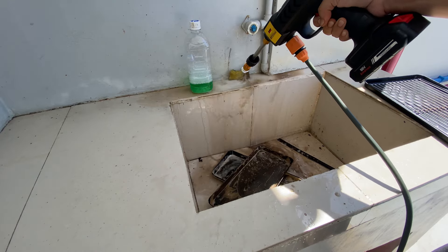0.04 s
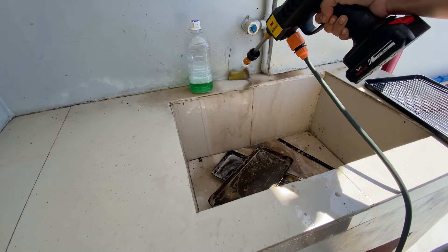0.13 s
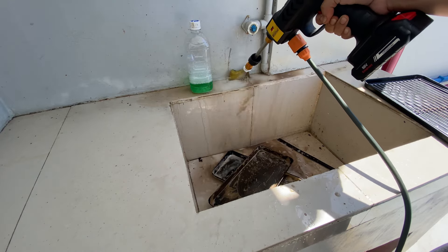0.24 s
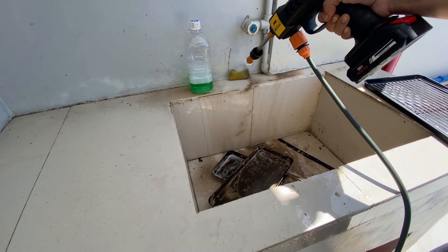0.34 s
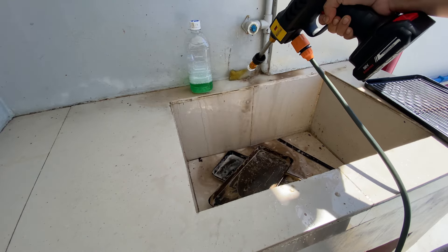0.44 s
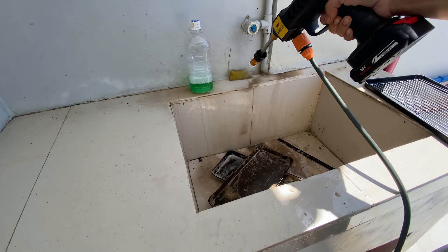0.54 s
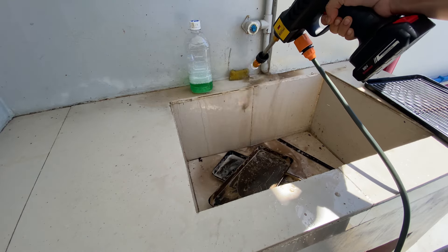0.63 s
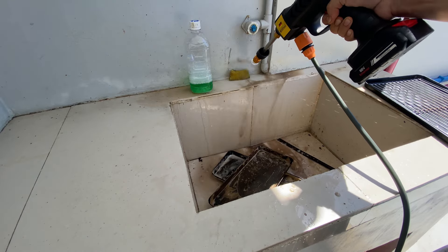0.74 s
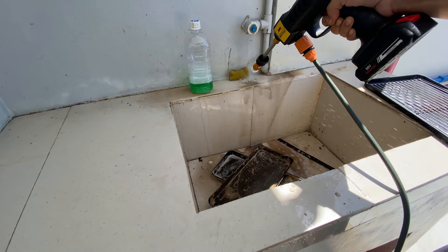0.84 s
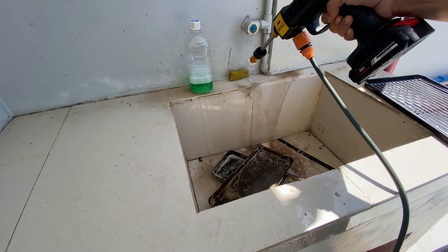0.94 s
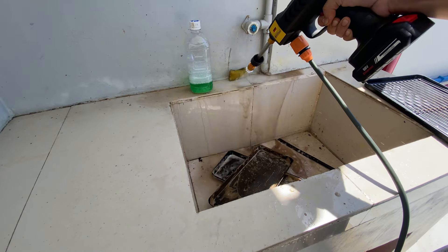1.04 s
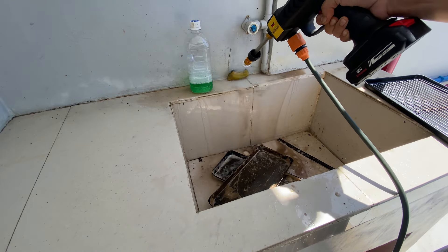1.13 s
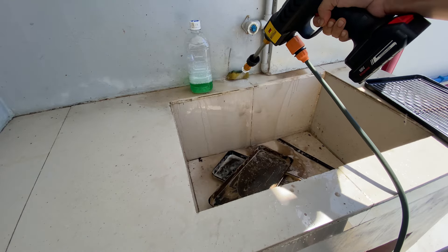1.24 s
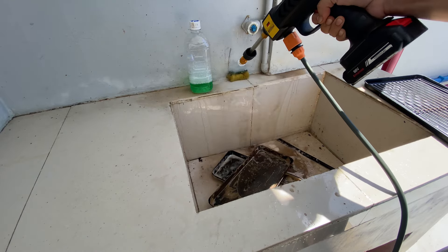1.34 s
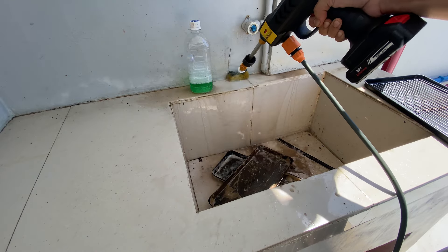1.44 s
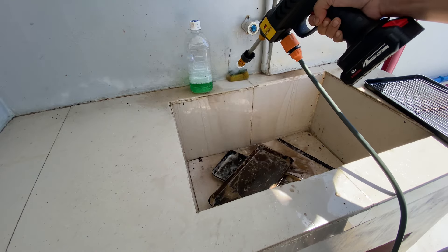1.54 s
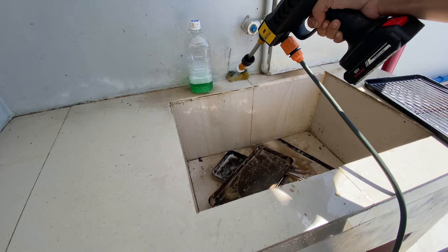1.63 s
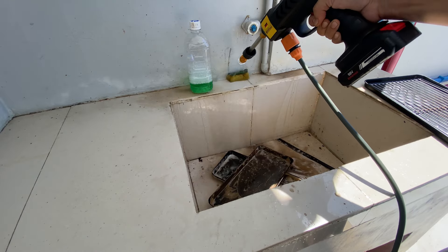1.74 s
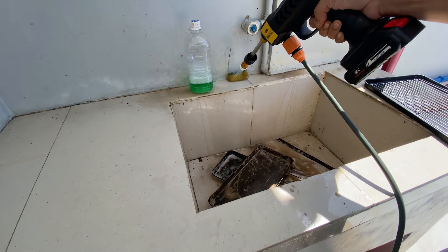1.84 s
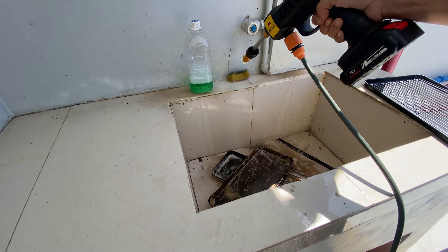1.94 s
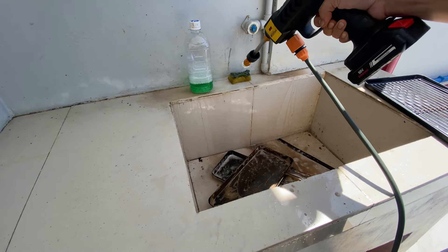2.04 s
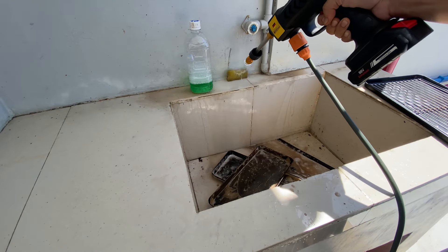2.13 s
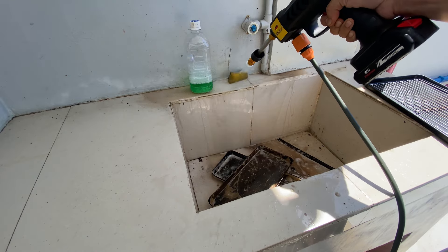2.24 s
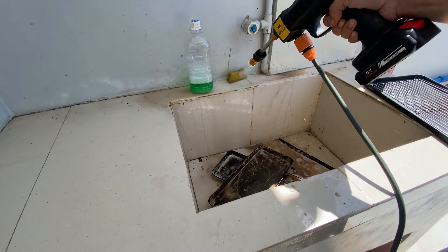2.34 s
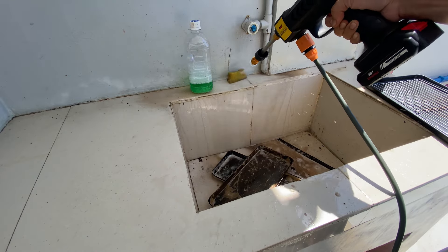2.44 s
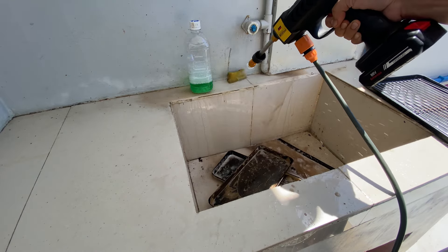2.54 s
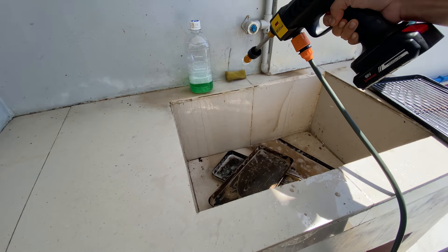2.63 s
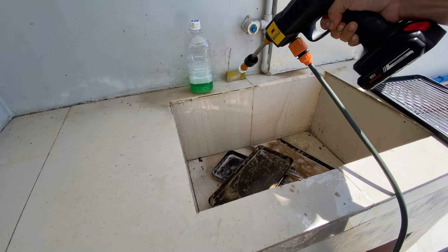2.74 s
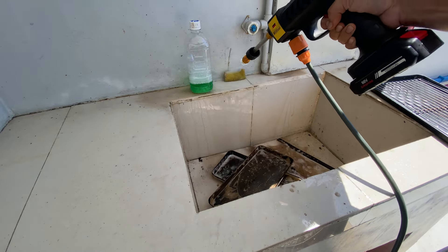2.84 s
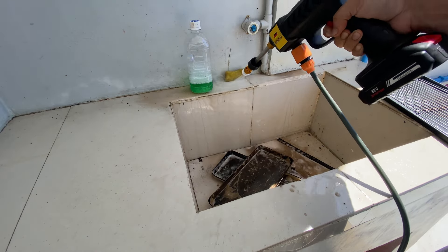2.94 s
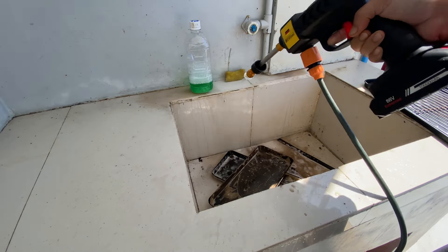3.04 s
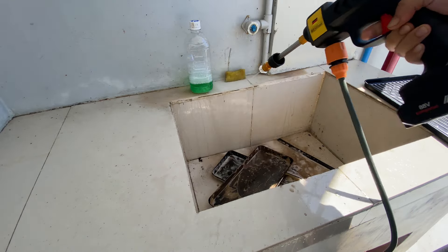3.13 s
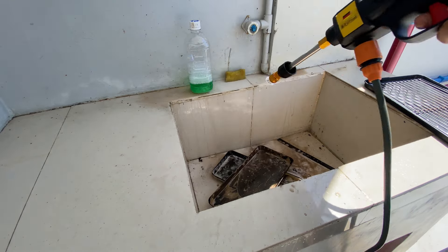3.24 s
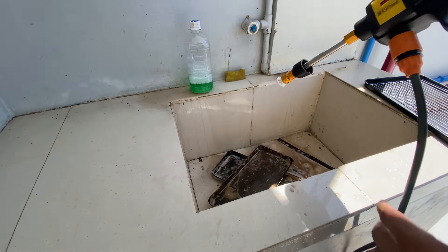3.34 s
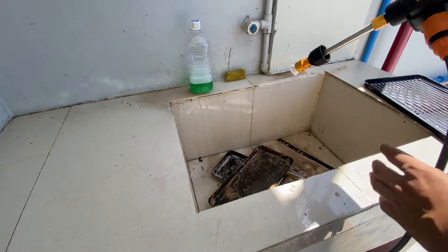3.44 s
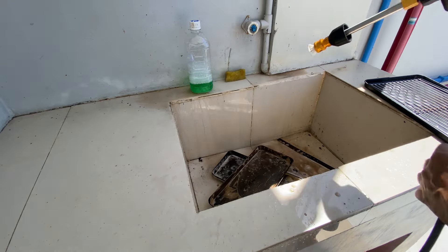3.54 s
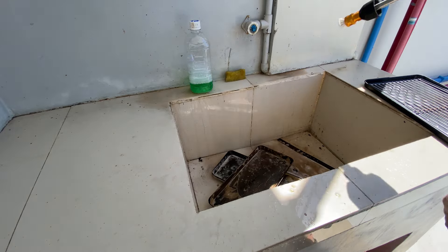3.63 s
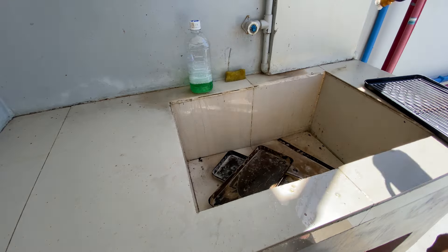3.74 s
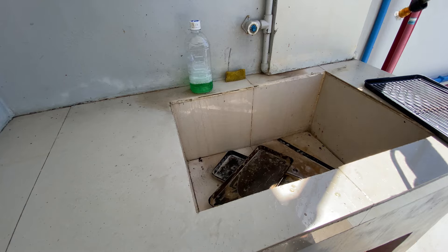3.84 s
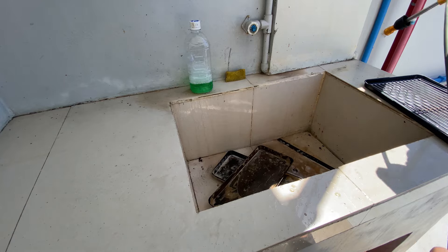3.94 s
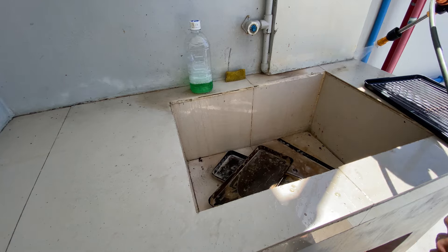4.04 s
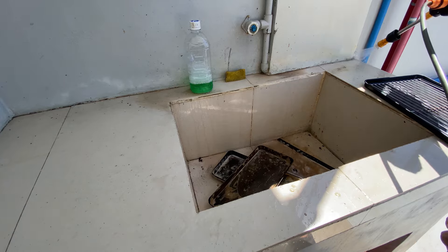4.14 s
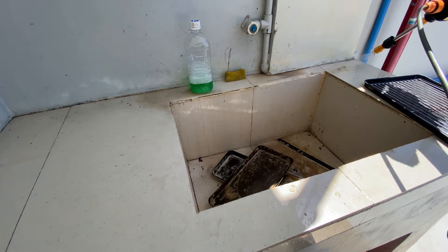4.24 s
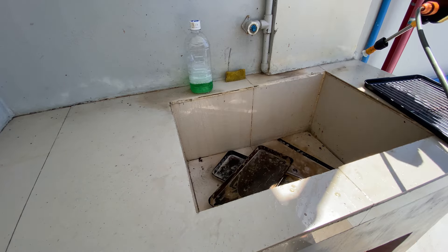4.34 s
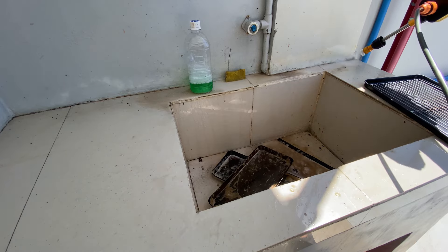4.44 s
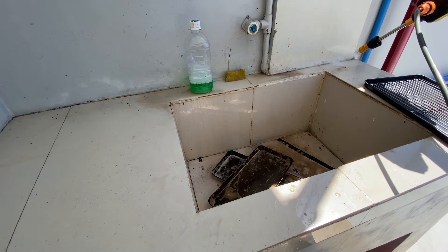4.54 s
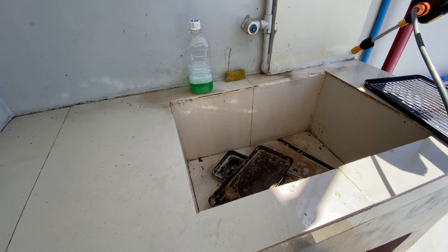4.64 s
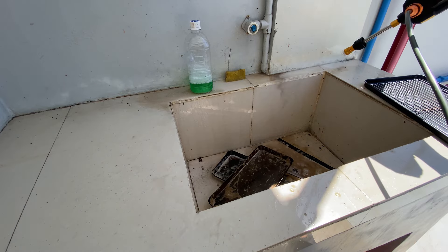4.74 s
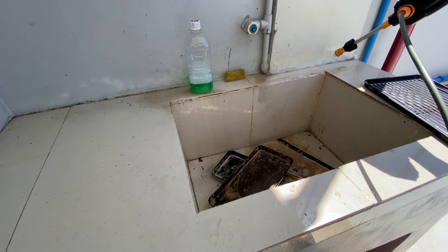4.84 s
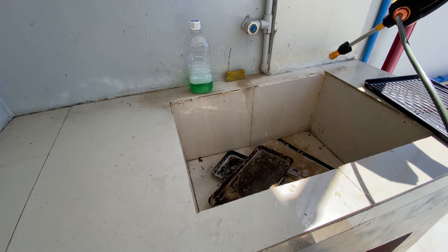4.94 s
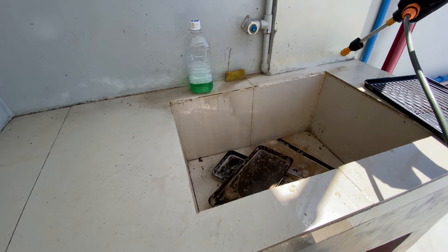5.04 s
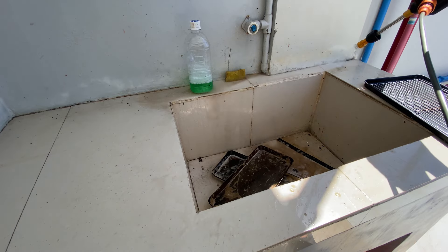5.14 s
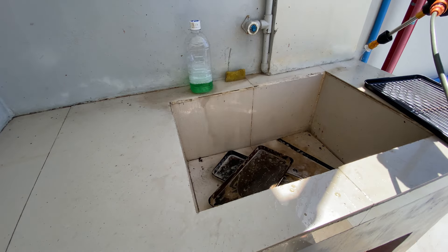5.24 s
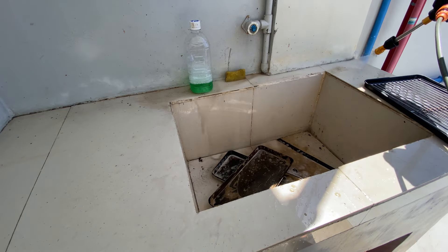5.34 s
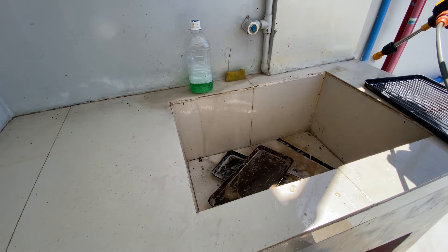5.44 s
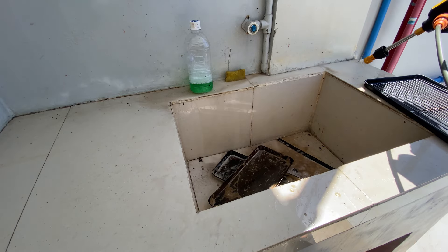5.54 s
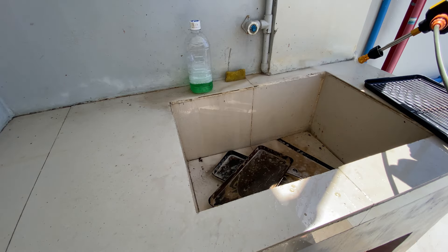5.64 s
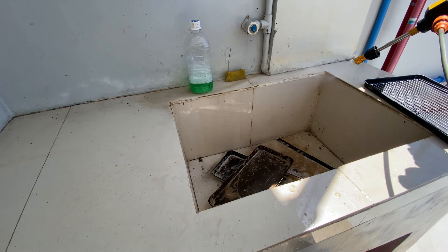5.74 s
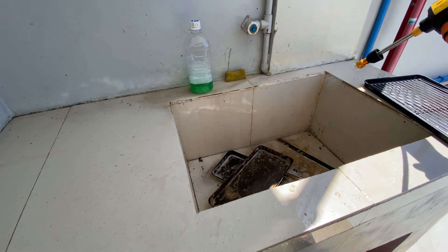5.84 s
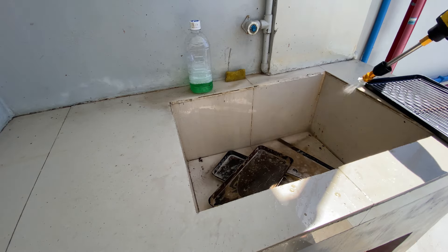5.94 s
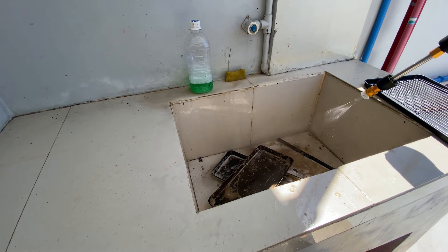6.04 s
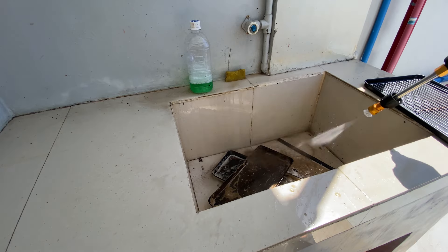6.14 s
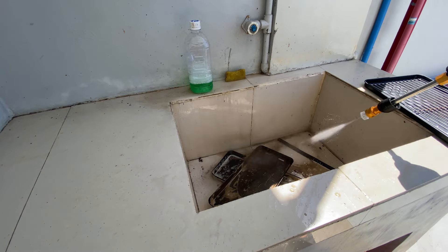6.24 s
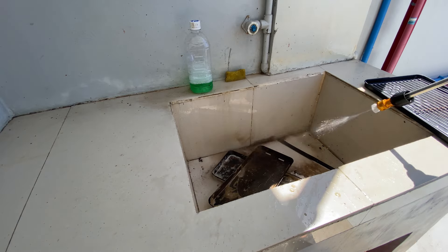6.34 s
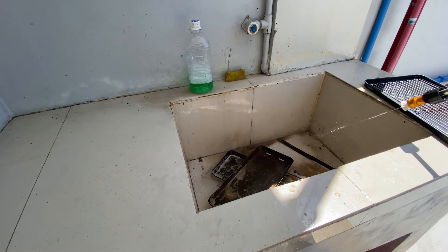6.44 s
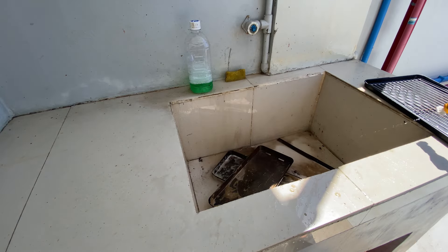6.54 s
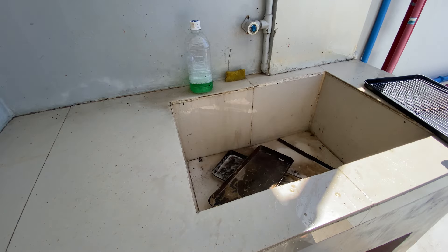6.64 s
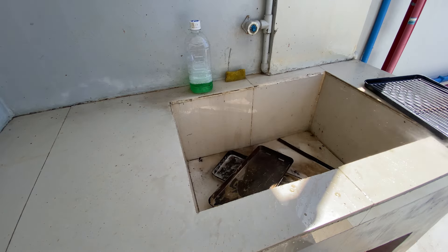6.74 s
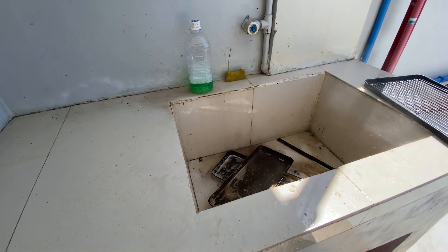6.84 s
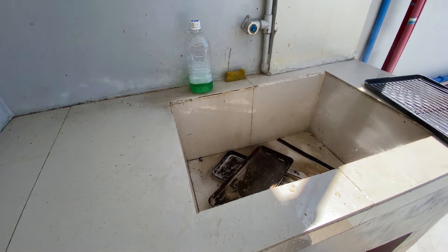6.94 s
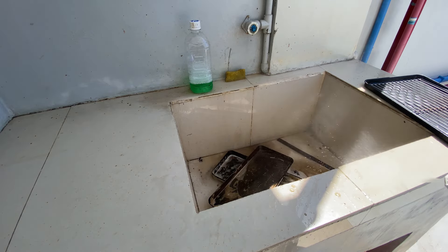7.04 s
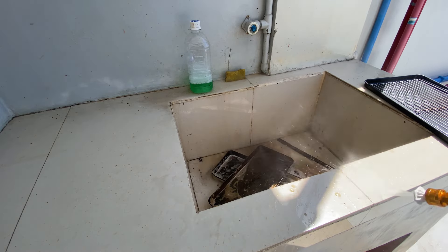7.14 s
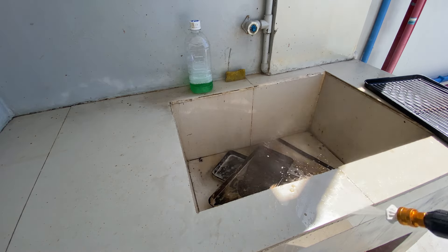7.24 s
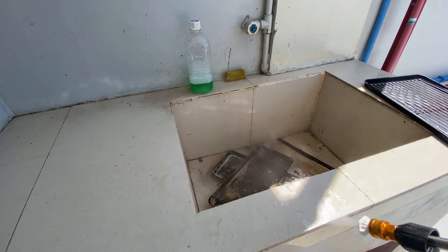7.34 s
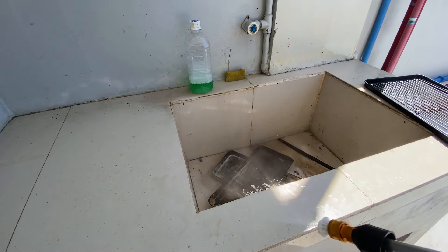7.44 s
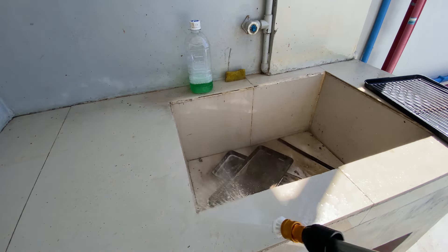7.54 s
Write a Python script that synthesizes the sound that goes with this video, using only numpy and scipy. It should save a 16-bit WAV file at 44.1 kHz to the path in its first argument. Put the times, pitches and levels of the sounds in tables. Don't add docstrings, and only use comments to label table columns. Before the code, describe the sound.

From 0 s a battery pressure washer is already running, close and slightly echoing off tiles: a fast, rough pump buzz near 40 turns a second, plastic rattle, thin gear and motor whine, and a bright spray hiss that pulses and flares as it sweeps. At 2.95 s the trigger releases and the whine slides down quickly. From 3.1 to 4 s water trickles and drips amid many small dull clacks and ticks of trigger and hose. At 3.97 s it spits and spins up again, with a differently coloured, more muffled buzz and low basin throbs swelling near 4.9 and 5.8 s. It stops at 6.29 s; run-off, spits and a strong clack at 6.6 s follow. At 6.69 s the third burst starts, growing with heavy low drumming from 6.9 s and continuing to the end at about 7.6 s. Soft wind rumble and a faint far machine throb underneath.

```python
import sys
import numpy as np
from scipy import signal
from scipy.fft import rfft, irfft, next_fast_len
from scipy.io import wavfile

SR = 44100
rng = np.random.default_rng(int(sys.argv[2]) if len(sys.argv) > 2 else 0)


def amplitude_ratio(level_db):
    exponent = np.asarray(level_db, float) / 20
    return 10 ** exponent


def int16_out(signal):
    q = np.round(np.clip(np.atleast_2d(signal).T, -1, 1) * 32767)
    wavfile.write(sys.argv[1], SR, q.astype(np.int16))


N = 334278
TIME = np.arange(N) / SR
SIZE = next_fast_len(N + 999)
GRID = np.maximum(np.arange(SIZE // 2 + 1) * SR / SIZE, 1)

# f/Hz, level/dB per Hz
RUMBLE_COLOUR = [(15, -47), (25, -24), (54, -7), (71, 3.5), (95, -34), (120, -45), (210, -120)]
# f/Hz, level/dB per Hz
BOOM_COLOUR = [(56, -42), (95, -6), (140, 3), (183, -3), (313, -12.5), (400, -36), (520, -57), (880, -120)]
# t/s, level/dB
WIND = [(0, 5.5), (3.4, 8), (3.7, 9.5), (4.5, 12), (6.1, 9.5), (7.58, 17)]
# t/s, half-width/s, level/dB
THUDS = [(1.54, .06, -2), (4.96, .1, -1), (5.95, 0.052, 16), (6.27, 0.18, 6.5), (6.84, 0.082, 13.5),
         (7.58, .06, 0)]
RUMBLE_DB, BOOM_DB, GUST_DB, GUSTS_HZ = -64, -60.5, 1.5, 4.5
FAR_HZ, FAR_T60_S, FAR_DB, FAR_BEATS_HZ = 580, 0.05, -54, 18

# t/s, level/dB
TRICKLE = [
    [(3.1, -43), (3.2, -48), (3.31, -45), (3.35, -46), (3.42, -45), (3.46, -48), (3.54, -44), (3.57, -44),
     (4.0, -44.5)],
    [(6.45, -39.5), (6.52, -49), (6.6, -45.5), (6.684, -42.5), (6.75, -64)],
]
# f/Hz, level/dB per Hz
TRICKLE_COLOUR = [(150, -44), (250, -54), (313, -3), (407, -47), (484, -7), (585, 9), (710, -40),
                  (845, -8.5), (1330, -5), (2400, -5), (3650, -10), (5500, -8.5), (7500, -9), (8300, -7.5),
                  (16000, -32)]
# t/s, peak level/dB, main ring f/Hz,
# brightness level/dB, pan/dB
CLACKS = [(3.189, -19, 1900, -11, -5), (3.232, -29, 630, -16, 20), (3.365, -23, 1830, -11, 3),
          (3.402, -33, 535, 1, -8), (3.49, -20.5, 330, -15, 4), (3.554, -24, 582, -19, 4),
          (3.566, -20, 1760, -23, 4), (3.612, -21.5, 625, -3, -3), (3.666, -31, 560, -12, 7),
          (3.73, -27, 590, -22, 23), (3.77, -27, 1350, -5, -3), (3.814, -23, 570, -5, 2),
          (3.89, -23, 558, -26, 14), (3.95, -51, 610, -5, 1), (6.604, -8.5, 848, -25, 0),
          (6.644, -16, 1920, -13, -4), (6.677, -29, 554, 0, -2), (6.702, -27, 570, -5, -6)]
# t/s, peak level/dB, main ring
# f/Hz, brightness level/dB, # pan/dB
TICKS = [(3.165, -27, 580, -20, 19), (3.27, -33, 570, -20, 15), (3.332, -27, 3200, -9, -2),
         (3.43, -27, 567, -25, 19), (3.48, -31, 595, -20, 10), (3.45, -29, 1980, -17, -2),
         (3.465, -24, 977, -24, 5), (3.52, -37, 570, -20, 8), (3.55, -31, 3030, -1, -5),
         (3.59, -37, 1460, -15, -2), (3.612, -21, 2420, -17, 5), (3.659, -30, 3990, -4, 0),
         (3.75, -25, 860, -20, 2), (3.83, -36, 1980, -12, 4), (3.893, -33, 1010, -2, -7),
         (6.45, -26, 580, -20, 0), (6.49, -22, 1970, -13, -2), (6.565, -38, 570, -20, 8),
         (6.54, -30, 1950, -10, 0), (6.608, -24, 3030, -8, 0), (6.732, -29, 626, -20, 0),
         (6.795, -17, 660, -12, -1)]
# ratio to the main ring, level/dB
PARTNERS = [(1.2, -16), (1.7, -10), (1.95, -12), (2.3, -10)]
CLACK_ATTACK_S, RING_T60_S = .0018, .045

# t/s, stroke tone level/dB
DRUM = [(0, -54.5), (4.1, -56), (4.51, -47.5), (4.9, -40.5), (5.4, -49), (5.73, -40.5), (5.83, -35.5),
        (6.28, -36), (6.8, -41), (6.9, -28), (7.02, -24.5), (7.14, -23.5), (7.37, -26.5), (7.58, -27)]
# t/s, half-width/s, level/dB
SLAPS = [(4.9, 0.075, 12), (5.2, 0.071, 13), (5.78, 0.11, 15.5), (6.86, 0.056, 8), (7.15, 0.059, 1),
         (7.56, 0.13, 9.5)]
# delay/ms, level/dB
TILES = [(1.1, -6.5), (2.3, -24), (3.7, -1.5), (5.9, -7.5), (8.2, 3), (12.7, -19)]
# f/Hz, level/dB
WALL_DULLING = [(2500, 0), (5000, -8), (16000, -12)]
# f/Hz, level/dB
SCATTER = [(60, -13), (150, -17), (300, -16), (800, -2.5), (1500, 7.5), (2500, 2.5), (4000, 4.5),
           (9000, 13.5)]
OCTAVE_DB, OCTAVE_FOLLOWS, OCTAVE_WAVER_DB = -52.5, 0.94, 3.5
WALLS_DB = -4

# f/Hz, level/dB per Hz
JET_COLOUR = [(1760, -23), (3000, 0), (3380, -3.5), (3750, -6), (4910, -2), (5270, -4), (5730, -2.5),
              (6050, -4.5), (6630, 0.5), (7000, -1.5), (7720, -8.5), (7950, -7), (8150, -2), (9120, -4),
              (13100, -7), (15200, -15), (15900, -11.5)]
# t/s, half-width/s, level/dB
SWEEPS = [(0.0, 0.67, 3.5), (1.0, 0.046, 3.5), (1.25, 0.15, 3), (1.37, 0.027, -3.5), (1.48, 0.055, 4),
          (1.67, 0.072, 3.5), (1.79, 0.048, -4), (1.9, 0.044, 7), (2.03, 0.15, -4), (2.14, 0.062, 6.5),
          (2.23, 0.076, -4), (2.3, 0.033, 4.5), (2.93, 0.025, 2), (4.3, 0.1, 5), (4.7, 0.56, 3),
          (5.35, 0.024, 1.5), (5.53, 0.15, 8), (6.13, 0.12, 5), (6.42, 0.11, 8.5), (7.33, 0.078, 8.5),
          (7.5, 0.12, 3)]
# t/s, level/dB
SPITS = [
    (3.19, -58),
    (3.975, -44),
    (6.505, -46),
    (6.555, -45),
    (6.70, -51),
]
SPIT_S = 0.015

# pressed t/s, released t/s, crank speed/turns per s, sag/turns per s each s
TRIGGER = [
    (-1, 2.952, 39.42, .08),
    (3.97, 6.285, 39.18, .02),
    (6.69, 8, 39.25, .25),
]
# pump level/dB, pump approach/dB per s, jet level/dB, motor whine level/dB, pan/dB
BURSTS = [
    (-29, -0.08, -32.5, -15, 1),
    (-31, 0.5, -36, -31, 0.65),
    (-30.5, 5, -36.5, -38, -0.5),
]
SPIN_UP_S, COAST_S = .042, .32
FRICTION_SPEED, FULL_SPEED = 20, 39
PUMP_POWER, JET_POWER, DRUM_POWER = 0.89, 2.2, 4.2
LEFT_LAG_MS = (0.465, 0.24, 0.36)
# f/Hz, level/dB per Hz
HOLD_1 = [(130, -36), (220, -51), (289, -35), (348, -18), (407, -17.5), (514, -10), (704, -20), (761, -1.5),
          (845, -9.5), (900, -7.5), (989, -0.5), (1050, -4), (1130, -9), (1690, -8.5), (2530, -9),
          (3250, -5.5), (5000, -16.5), (6500, -34), (11000, -120)]
# f/Hz, level/dB per Hz
HOLD_2 = [(130, -16), (220, -27), (396, -18), (423, -17), (514, -1.5), (686, -3.5), (742, -10.5), (802, -5),
          (1070, -3.5), (1270, -5), (1620, -4), (1830, -2.5), (3250, -3.5), (4060, -11), (5000, -29),
          (6500, -70), (11000, -120)]
# f/Hz, level/dB per Hz
HOLD_3 = [(130, -41), (220, -13), (275, -38), (313, -9), (391, -11), (423, -13), (469, -7), (610, -1),
          (742, -4), (914, 1), (1340, -3), (1730, -0.5), (1980, -4), (2310, 1), (5000, -8.5), (6500, -79),
          (11000, -120)]
# place/turn, level/dB
KNOCKS = [(.0, 0), (0.131, 6.5), (0.272, 13), (.5, -27), (.66, 9), (0.81, 12)]
STROKE_DB, STROKE_PHASE = 1.5, 1
# cycles per turn, level/dB
TONES_1 = [(1, -24), (2, -11), (3, -20), (4, -18), (5, -14), (6, -23), (7, -15), (8, -14), (9, -8),
           (10, -11), (11, -9), (12, -8), (13, -6), (14, -9), (15, -8), (16, -14), (17, -12), (18, -15),
           (19, -16), (20, -5), (21, -13), (22, -9), (23, -1), (24, -5), (25, 0), (26, -3), (27, -5),
           (28, -11), (29, -14), (30, -10)]
# cycles per turn, level/dB
TONES_2 = [(1, -24), (2, 0), (3, -18), (4, -11), (5, -17), (6, -22), (7, -20), (8, -18), (9, -17),
           (10, -17), (11, -6), (12, -12), (13, -18), (14, -15), (15, -15), (16, -15), (17, -15), (18, -8),
           (19, -16), (20, -8), (21, -6), (22, -12), (23, -10), (24, -7), (25, -4), (26, -11), (27, -3),
           (28, -7), (29, -15), (30, -8)]
# cycles per turn, level/dB
TONES_3 = [(1, -36), (2, 0), (3, -30), (4, -17), (5, -24), (6, -33), (7, -36), (8, -25), (9, -29),
           (10, -34), (11, -21), (12, -25), (13, -21), (14, -20), (15, -21), (16, -12), (17, -19),
           (18, -19), (19, -23), (20, -18), (21, -21), (22, -16), (23, -15), (24, -17), (25, -23),
           (26, -24), (27, -26), (28, -22), (29, -24), (30, -25)]
TONES_DB = (-1, -.5, -1)
# cycles per turn, level/dB under the strongest tone
MESH = [(33, -8), (36, -10), (38, -22), (40, -5), (41, -27), (43, -11), (44, -4.5), (46, -7), (47, -32),
        (50, -4), (54, -10.5), (56, -6.5)]
# cycles per turn, level/dB under the pump
GEARS = [(42, -15), (45, -19), (48, -21), (72, -23), (84, -16), (90, -20)]
BLOW_TURN, BLOW_SCATTER, BLOW_LOWEST = .23, (.6, 1.0, 1.1), 19
MOTOR_CYCLES = 144
# t/s, level/dB
MOTOR_FADE = [(0, 1), (.5, 5), (1.45, 5), (1.8, -3)]
COAST_CYCLES, COAST_DB = 45, (-1, -4.5, -4)
# f/Hz, level/dB
HOUSING = [(450, -30), (600, 2), (730, -3), (850, 2), (930, 0), (1010, 3), (1120, -1), (1230, 2),
           (1340, -3), (1470, 2), (1600, -4), (1760, 3)]
# t/s, half-width/s, cycles per turn, level/dB
SINGS = [(1.8, 1.3, 84, -41), (1.7, 1.0, 85, -43), (5.6, .5, 42, -42), (5.2, .6, 18, -42),
         (5.9, .4, 89, -43), (2.7, .3, 89, -43), (4.65, .4, 27, -40), (4.6, .3, 28, -40),
         (4.5, .4, 42, -37), (5.45, .2, 89, -46), (6.22, .07, 21, -32), (7.35, .35, 23, -35),
         (7.1, .3, 24, -38), (7.1, .3, 44, -41), (1.5, 1.6, 20, -43), (1.5, 1.6, 23, -43),
         (5.2, 1.0, 11, -45), (7.52, .08, 22, -37), (6.93, .07, 20, -38)]
# t/s, half-width/s, f/Hz, climb/Hz per s, level/dB
WIND_UPS = [(4.03, 0.02, 582, 350, -40), (4.05, .02, 1580, 2700, -39), (6.72, .035, 578, 1800, -43),
            (6.8, .03, 644, 270, -40), (6.8, .04, 865, 1500, -54), (7.44, .03, 550, 0.1, -36)]

# f/Hz, left minus right level/dB
PORTS = [(60, 4), (110, 14), (200, 4.5), (380, -1), (700, -2.5), (1290, -3), (2380, -0.5), (4400, -6),
         (8120, -7.5), (15000, 7.5)]
# f/Hz, phase/rad
PORT_PHASE = [(150, 0), (300, .8), (420, 0), (540, -.6), (740, 0)]


def rms_one(x):
    return x / np.sqrt(np.mean(np.square(x)) + 1e-20)


def shape(points):
    hz, db = np.transpose(points)
    return amplitude_ratio(np.interp(np.log(GRID), np.log(hz), db))


def colour(x, gains):
    return irfft(rfft(x, SIZE) * gains, SIZE)[..., :N]


def fader(rows):
    return np.interp(TIME, *np.transpose(rows))


def curve(tables, column):
    out = np.zeros(N)
    for rows in tables:
        rows = np.array(rows)
        inside = np.minimum(TIME - rows[0, 0] + .02, rows[-1, 0] - TIME + .02)
        edge = np.clip(inside / .02, 0, 1)
        out += edge * amplitude_ratio(np.interp(TIME, rows[:, 0], rows[:, column]))
    return out


def swells(rows):
    return sum(db * np.exp(-((TIME - s) / width) ** 2) for s, width, db in rows)


def drift(rate_hz):
    r = np.exp(-16 * np.pi * rate_hz / SR)
    settle = 6000
    slow = signal.lfilter([1], [1, -2 * r, r * r], rng.standard_normal(N // 8 + 2 + settle))[settle:]
    return np.interp(np.arange(N) / 8, np.arange(len(slow)), rms_one(slow))


def ring(x, hz, t60):
    r, w = amplitude_ratio(-60 / (t60 * SR)), 2 * np.pi * hz / SR
    return signal.lfilter([0, np.sin(w)], [1, -2 * r * np.cos(w), r * r], x + 1e-18)


def heard(x, points, lag_ms, echoes=0.):
    late = np.exp(-2j * np.pi * GRID * lag_ms * np.array([[.001], [0]]))
    scatter, spectra = shape(SCATTER), rfft(x, SIZE)
    gains = shape(points) / np.sqrt(1 + scatter ** 2)
    both = spectra[0] * (late + echoes) + spectra[1:] * scatter
    return rms_one(irfft(gains * both, SIZE)[:, :N])


def late_turns(turns, speed, lag_ms):
    return turns - lag_ms * np.array([[.001], [0]]) * speed


def far_machine():
    phase = (FAR_BEATS_HZ * TIME + .15 * drift(3)) % 1
    beat = np.exp(-phase / .25) * amplitude_ratio(3 * drift(4))
    far = rms_one(ring(beat * rng.standard_normal(N), FAR_HZ, FAR_T60_S))
    return amplitude_ratio(FAR_DB) * far * amplitude_ratio(np.array([[4.], [-6.]]))


def yard():
    wind_db = fader(WIND)
    rumble_db = RUMBLE_DB + 0.5 + wind_db + GUST_DB * drift(GUSTS_HZ)
    boom_db = BOOM_DB + 0.54 * wind_db + swells(THUDS) + GUST_DB * drift(GUSTS_HZ)
    rumble = amplitude_ratio(rumble_db) * heard(rng.standard_normal((3, N)), RUMBLE_COLOUR, .1)
    boom = amplitude_ratio(boom_db) * heard(rng.standard_normal((3, N)), BOOM_COLOUR, .1)
    return rumble + boom + far_machine()


def trickle():
    splash = rng.standard_normal((3, N)) * amplitude_ratio(1.5 * drift(9) + 1.8 * drift(71))
    born = (rng.random((2, N)) < 90 / SR) * amplitude_ratio(10.0 * np.minimum(rng.exponential(1, N), 2.2))
    dealt = rng.integers(0, 12, N)
    pitches = np.geomspace(750, 3400, 12)
    drips = sum(ring(born * (dealt == k), hz, 60 / hz) for k, hz in enumerate(pitches))
    return curve(TRICKLE, column=1) * (heard(splash, TRICKLE_COLOUR, 0.053) + amplitude_ratio(-9.0) * rms_one(drips))


def clacks(rows):
    out, t = np.zeros((2, N)), TIME[:SR // 12]
    knock_band = signal.butter(1, [500, 2500], "band", fs=SR, output="sos")
    spit_band = signal.butter(2, [2500, 9500], "band", fs=SR, output="sos")
    for s, db, hz, bright_db, pan_db in rows:
        envelope = np.exp(-t / 0.011) * np.minimum(t / CLACK_ATTACK_S, 1)
        flurry = rng.standard_normal((2, len(t))) * envelope
        body = ring(flurry, hz, RING_T60_S)
        for ratio, up_db in PARTNERS:
            if ratio * hz < 3000:
                body = body + amplitude_ratio(up_db) * ring(flurry, ratio * hz, 0.079)
        knock = signal.sosfilt(knock_band, flurry)
        spit = signal.sosfilt(spit_band, flurry)
        hit = body / np.abs(body).max() + amplitude_ratio(-6.5) * knock / np.abs(knock).max()
        hit += amplitude_ratio(bright_db + 10) * spit / np.abs(spit).max()
        at = round(s * SR)
        out[:, at:at + len(t)] += amplitude_ratio(db - 12.0 + np.array([[pan_db], [-pan_db]]) / 2) * hit
    return out


def whine(turns, orders, wobble_db, slip):
    out = 0
    for cycles, db in orders:
        level = amplitude_ratio(db + wobble_db * drift(2.1)) * np.sqrt(2)
        out = out + level * np.sin(2 * np.pi * cycles * turns + slip * drift(18.0))
    return out


def walls():
    sides = rng.uniform(.8, 1.25, (len(TILES), 2, 1))
    echoes = sum(amplitude_ratio(db + WALLS_DB) * np.exp(-.002j * np.pi * GRID * ms * side)
                 for (ms, db), side in zip(TILES, sides))
    return shape(WALL_DULLING) * echoes


def basin(turns, load):
    force_db = fader(DRUM)
    octave_db = OCTAVE_DB + OCTAVE_FOLLOWS * (force_db + 31.5) + swells(SLAPS)
    tone = amplitude_ratio(force_db) * whine(turns, [(2, 0)], wobble_db=2.5, slip=0.055)
    octave = amplitude_ratio(octave_db) * whine(turns, [(4, 0)], wobble_db=OCTAVE_WAVER_DB, slip=0.068)
    return amplitude_ratio(-1.5) * load ** DRUM_POWER * (tone + octave)


def lance_spits():
    return sum(amplitude_ratio(db) * np.clip((TIME - s) / 0.0072, 0, 1) * np.exp(-np.abs(TIME - s) / SPIT_S)
               for s, db in SPITS)


def jet(turns):
    stroke_db = 1.6 * np.cos(4 * np.pi * turns - 1.2) + 0.15 * np.cos(2 * np.pi * turns)
    sputter_db = 0.82 * drift(28.0) + 0.67 * drift(47)
    sizes = amplitude_ratio(7 * np.minimum(rng.exponential(1, N), 4)) * rng.choice([-1, 1], N)
    ticks = (rng.random((3, N)) < 2500 / SR) * sizes
    return amplitude_ratio(stroke_db + sputter_db) * (rng.standard_normal((3, N)) + amplitude_ratio(-9) * rms_one(ticks))


def wind_up():
    out = 0
    for s, half, hz, climb, db in WIND_UPS:
        t = TIME - s
        level = amplitude_ratio(db + 1.1 * drift(30)) * np.exp(-(t / half) ** 2)
        out = out + level * np.sqrt(2) * np.sin(2 * np.pi * (hz + climb * t / 2) * t)
    return out


def singing(turns, speed):
    tones = sum(np.exp(-((TIME - s) / half) ** 4) * whine(turns, [(cycles, db)], wobble_db=1.5, slip=0.59)
                for s, half, cycles, db in SINGS)
    return np.array([np.interp(side, turns, tones) for side in late_turns(turns, speed, LEFT_LAG_MS[1])])


def motor_whine(turns, load):
    return whine(turns, [(MOTOR_CYCLES, 0)], wobble_db=2.5, slip=.2) * load ** 20 * amplitude_ratio(fader(MOTOR_FADE))


def coasting(turns, speed, load):
    off_speed = np.clip(12 * (1 - load), 0, 1)
    falling = np.where(np.gradient(speed) > 0, .3, 1)
    flutter = amplitude_ratio(3 * np.cos(4 * np.pi * turns) + 2.2 * drift(40))
    mesh = [(COAST_CYCLES + k, -1.4 * abs(k)) for k in (-18, -7, 0, 9)]
    housing = amplitude_ratio(np.interp(COAST_CYCLES * speed, *np.transpose(HOUSING)))
    return off_speed * falling * flutter * whine(turns, mesh, wobble_db=1., slip=1.1) * housing


def hum(turns, orders, scatter, spread):
    k, db = np.transpose(orders[4:])
    k, db = np.hstack([[k, db - db.max()], np.transpose(MESH)])
    turn = np.arange(2049) / 2048
    astray = np.where(k < BLOW_LOWEST, np.pi, scatter) * rng.standard_normal((2, 1, len(k)))
    side_phase = spread * rng.choice([-1, 1], len(k)) * [[1], [-1]]
    phase = astray - 2 * np.pi * k * BLOW_TURN + side_phase
    waves = np.sum(amplitude_ratio(db) * np.sin(2 * np.pi * k * turn[:, None, None, None] + phase), axis=-1)
    blend = .22 * drift(2.5)
    return rms_one([np.cos(blend) * np.interp(turns % 1, turn, waves[:, 0, side])
                    + np.sin(blend) * np.interp(turns % 1, turn, waves[:, 1, side]) for side in range(2)])


def crank(pressed, released, top, sag):
    held = np.clip(TIME, pressed, released) - pressed
    driven = (top - sag * held) * (1 - np.exp(-held / SPIN_UP_S))
    fall = np.exp(-np.maximum(TIME - released, 0) / COAST_S)
    return np.maximum((driven + FRICTION_SPEED) * fall - FRICTION_SPEED, 0)


def pump(turns):
    knocks, after = np.zeros(N), np.zeros(N)
    for turn, db in KNOCKS:
        count = np.floor(turns - turn + .0012 * drift(15))
        at = np.flatnonzero(np.diff(count, prepend=0) > 0)
        knocks[at] += amplitude_ratio(db + 0.63 * rng.standard_normal(len(at)))
        after += amplitude_ratio(db) * np.exp(-((turns - turn) % 1) / 0.28)
    stroke_db = 1.26 * drift(57) + STROKE_DB * np.cos(4 * np.pi * turns - STROKE_PHASE)
    rattle = rng.standard_normal((3, N)) * (0.57 + after) * amplitude_ratio(stroke_db)
    direct_only = [[1], [0], [0]]
    return rms_one(rattle) + amplitude_ratio(4) * rms_one(np.diff(knocks, prepend=0)) * direct_only


def scene():
    speeds = [crank(*row) for row in TRIGGER]
    speed = sum(speeds)
    turns, load = np.cumsum(speed) / SR, np.minimum(speed / FULL_SPEED, 1)
    out = yard() + trickle() + clacks(CLACKS) + clacks(TICKS)
    out += basin(turns, load) + singing(turns, speed) + wind_up()

    knocking, hiss = pump(turns), jet(turns)
    gears = whine(turns, GEARS, wobble_db=2.0, slip=0.9) * load ** 6
    motor, coast = motor_whine(turns, load), coasting(turns, speed, load)
    aim = amplitude_ratio(swells(SWEEPS))
    spits = lance_spits() / len(BURSTS)
    holds = zip((HOLD_1, HOLD_2, HOLD_3), (TONES_1, TONES_2, TONES_3), TONES_DB, BLOW_SCATTER,
                COAST_DB, LEFT_LAG_MS)
    for trigger, own, burst, hold_settings in zip(TRIGGER, speeds, BURSTS, holds):
        pump_db, approach, jet_db, motor_db, pan_db = burst
        hold, tones, tones_db, scatter, coast_db, lag_ms = hold_settings
        echoes = walls()
        share, pan = np.minimum(own / FULL_SPEED, 1), amplitude_ratio(pan_db * np.array([[.5], [-.5]]))
        metal = gears + amplitude_ratio(motor_db) * motor + amplitude_ratio(coast_db) * coast
        teeth = np.array([np.interp(side, turns, metal) for side in late_turns(turns, speed, lag_ms)])
        pressure_tones = load ** 3 * amplitude_ratio(tones_db) * hum(turns, tones, scatter, spread=0.98)
        pump_level = amplitude_ratio(1.0 + pump_db + approach * (TIME - trigger[0])) * share ** PUMP_POWER
        out += pan * pump_level * (heard(knocking, hold, lag_ms, echoes) + pressure_tones + teeth)
        jet_level = amplitude_ratio(jet_db) * aim * share ** JET_POWER + 2 * spits
        out += pan * amplitude_ratio(3.5) * jet_level * heard(hiss, JET_COLOUR, lag_ms, echoes)
    return out


def band_limit(x):
    return signal.sosfilt(signal.butter(12, 16240, fs=SR, output="sos"), x)


def record(dry):
    top = shape([(20, -22), (45, 0), (15740, 0), (15790, -28), (16250, -36)])
    phase_hz, phase = np.transpose(PORT_PHASE)
    lead = np.exp(1j * np.interp(np.log(GRID), np.log(phase_hz), phase))
    left = colour(dry[0], lead * top * shape(PORTS) ** .5)
    right = colour(dry[1], top * shape(PORTS) ** -.5)
    mid = (left + right) / 2
    side = colour((left - right) / 2, shape([(9000, 0), (10500, -2.5), (11300, -29.5)]))
    return band_limit(np.array([mid + side, mid - side]))


dry = scene()
out = record(dry)
int16_out(out)
```